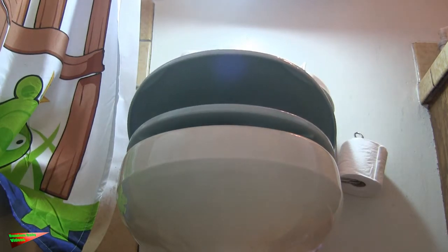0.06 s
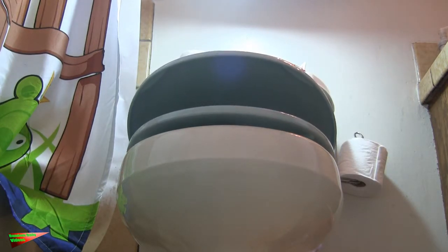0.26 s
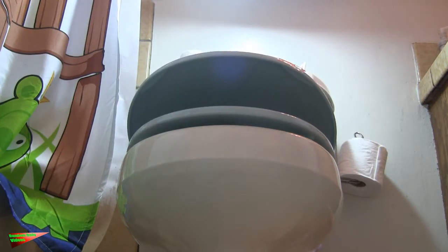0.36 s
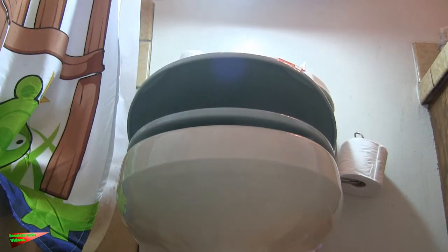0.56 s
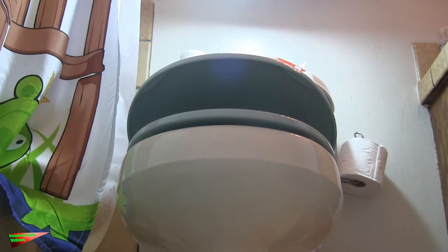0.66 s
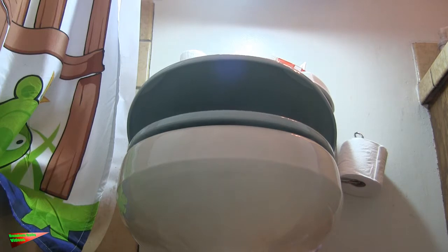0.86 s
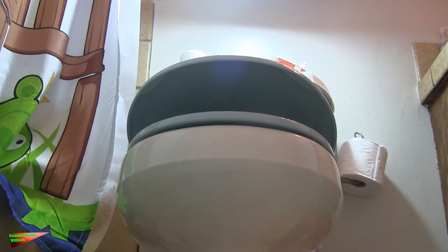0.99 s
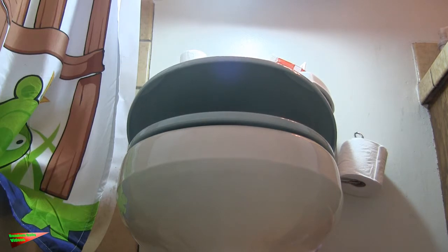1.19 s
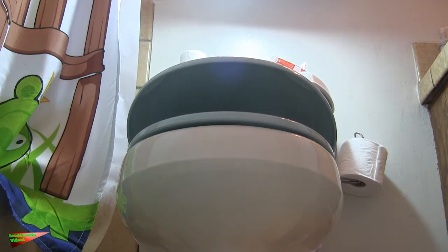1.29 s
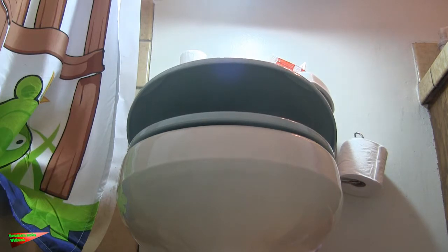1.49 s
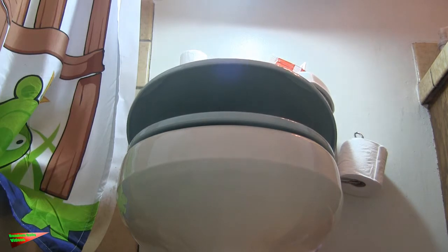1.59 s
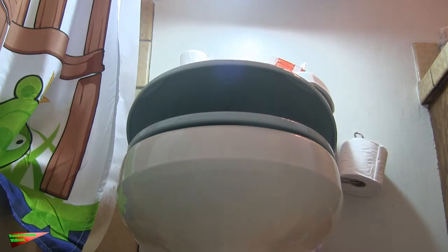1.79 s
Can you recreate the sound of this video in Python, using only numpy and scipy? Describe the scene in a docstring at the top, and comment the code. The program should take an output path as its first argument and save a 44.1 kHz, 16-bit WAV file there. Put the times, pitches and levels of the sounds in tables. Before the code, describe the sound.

A plastic toilet seat knocks against the bowl and rattles, its loose hinges clicking. After a few light taps the lid clacks with a low thud. Each hit rings briefly in a small tiled bathroom.

```python
"""A plastic toilet seat and lid are handled in a small tiled bathroom, over soft hiss and faint rubbing.
First the seat knocks against the bowl, shudders and rattles; loose hinges click and the bowl thuds.
After a few light taps the lid knocks, just before one second, with its own clicks, thud and rattle.
Faint last taps follow. The tiles give every hit a short, bright ring."""
import sys
import numpy as np
from scipy import signal
from scipy.io import wavfile

SR = 44100
rng = np.random.default_rng(int(sys.argv[2]) if len(sys.argv) > 2 else 0)


def dump_mix(stems):
    """Bounce the given channels to the path in sys.argv[1] as a 16-bit WAV at rate SR."""
    frames = np.atleast_2d(stems).T  # one column per channel
    limited = np.clip(frames, -1, 1)  # hard clip at full scale
    pcm = np.round(limited * 32767).astype(np.int16)
    wavfile.write(sys.argv[1], SR, pcm)


N = 81585
T = np.arange(N) / SR

# the bathroom's reverb: (frequency [Hz], level [dB], t60 [s], left-right likeness [0-1])
ROOM = [(100, -4, 0.49, 1), (336, -5, 0.28, 0.81), (650, 3, 0.35, 0.82), (1210, -8, 0.31, 0.87),
        (2570, -4, 0.2, 0.73), (5330, 1, 0.23, 0.8), (13000, 0, 0.16, 0.59)]


def seat():
    """The seat knocks on the bowl and bounces, with a long clatter."""
    # (time [s], level [dB], brightness [Hz])
    hits = [(.2322, -12.5, 2240), (.2352, -19, 1330), (.252, -25.5, 875), (.2785, -27.5, 860),
            (.450, -33.5, 715), (.476, -33, 434)]
    # the seat's resonances: (frequency [Hz], level [dB], t60 [s])
    modes = [(390, -9, 0.097), (476, -7, 0.044), (641, -11, .045), (739, -11, 0.039), (858, -6.5, 0.042),
             (929, -3.5, 0.059), (1035, -2.5, 0.019), (1243, 3, 0.024), (1390, -3, 0.045),
             (1535, -2, 0.032), (2130, -6.5, 0.037)]
    return struck_plastic(hits, modes, clatter_db=-4, clatter_t60=0.1768, clatter_hz=(296, 1597))


def lid():
    """The lid lands in a quick double knock and bounces once, with a tight clatter."""
    # (time [s], level [dB], brightness [Hz])
    hits = [(.9315, -18.5, 2530), (.9355, -15.5, 1860), (1.003, -31.5, 674)]
    # the lid's resonances: (frequency [Hz], level [dB], t60 [s])
    modes = [(376.6, -4.5, 0.095), (497, -7.5, 0.071), (824, -14, 0.057), (972, -6.5, 0.029),
             (1090, -1, 0.05), (1170, -1, 0.059), (1283, -0.5, 0.05), (1470, 3.5, 0.018),
             (1929, -8.5, 0.052), (2000, -13, 0.056), (2120, -14, 0.033)]
    return struck_plastic(hits, modes, clatter_db=-4, clatter_t60=0.0142, clatter_hz=(784, 1795))


def taps():
    """Plastic touches plastic lightly and rings high."""
    # (time [s], level [dB], brightness [Hz])
    hits = [(0.4441, -34.5, 1000), (.687, -56.5, 1000), (0.7522, -32.5, 8000), (.7548, -31.5, 4860),
            (1.42, -48, 990), (1.463, -59, 600), (1.84, -47.5, 1000)]
    # a tap's resonances: (frequency [Hz], level [dB], t60 [s])
    modes = [(1151, -14.5, 0.056), (1587, -1, 0.038), (1757, 1, 0.019), (2153, 0.5, 0.025),
             (2920, -2.5, 0.0086), (3640, -7, 0.091), (5550, -6, 0.018), (9200, -1, .025)]
    return struck_plastic(hits, modes, clatter_db=-7, clatter_t60=0.16, clatter_hz=(1100, 3600))


def struck_plastic(hits, modes, clatter_db, clatter_t60, clatter_hz):
    """A shell rings and its many weak modes merge into clatter; a softer contact dulls both."""
    out, shell = 0, unit_blow(ring(modes))
    for s, db, brightness_hz in hits:
        clatter = unit_blow(filtered(rng.standard_normal(N) * decay(clatter_t60), clatter_hz, "band"))
        knock = filtered(shell + from_db(clatter_db) * clatter, brightness_hz, "low")
        out += from_db(db) * delayed(unit_blow(knock), s)
    return out


def bowl_thuds():
    """Weight lands softly, waking the low modes of bowl and room near its pitch, and a short rumble."""
    # (time [s], level [dB], centre [Hz], spread to 10 dB down [octaves])
    landings = [(0.2321, -19, 167, 1.45), (0.4446, -23.5, 99.7, 1.15), (0.753, -34, 66.5, 0.56),
                (0.9317, -20.5, 81, 1.64), (1.001, -36, 142, 1.16), (1.115, -39.5, 216, 0.95),
                (1.417, -55, 140, 1.2)]
    # low resonances: (frequency [Hz], level [dB], t60 [s])
    bowl_modes = [(70.5, 2, 0.41), (89.5, -5, 0.068), (116.3, 1, 0.42), (136.1, 1, 0.33), (163, -3, 0.47),
                  (206.8, -6, 0.29), (235.8, -8.5, 0.51), (260, -3, 0.38), (405, -14, 0.23)]
    out, attack = 0, 1 - np.exp(-T / 0.0041)
    for s, db, centre, spread in landings:
        woken = [(hz, level - 10 * (np.log2(hz / centre) / spread) ** 2, t60)
                 for hz, level, t60 in bowl_modes]
        rumble = from_db(-6) * noise_band(np.sqrt(160 * centre), octaves=1.65) * decay(t60=0.45)
        out += from_db(db) * delayed((ring(woken) + rumble) * attack, s)
    return out


def seat_shudder():
    """After its knock the seat flexes freely for a moment and is stopped as it settles."""
    # bending modes: (frequency [Hz], rms level at full swing [dB])
    modes = [(140, -16.5), (207, -17.5)]
    start_s, length_s = .233, .054
    swing = np.sqrt(np.abs(np.sin(np.pi * np.minimum(T / length_s, 1))))
    flex = sum(np.sqrt(2) * from_db(db) * np.sin(2 * np.pi * hz * T) for hz, db in modes)
    return delayed(swing * flex, start_s)


def hinge_clicks():
    """Loose hinges give hard, gritty cracks, coloured by their own ringing."""
    # (time [s], level [dB], brightness [Hz])
    clicks = [(.2345, -33, 3470), (.2395, -35, 10800), (.252, -32, 4950), (.263, -36.5, 5000),
              (0.2787, -36, 5900), (0.451, -40, 3970), (0.4611, -37, 6500), (.473, -45, 3480),
              (.687, -55, 5000), (0.7526, -33.5, 9400), (0.9329, -28, 8900), (0.9433, -28.5, 14600),
              (.955, -36.5, 7000), (1.414, -52.5, 15100)]
    # hinge resonances: (frequency [Hz], width [Hz], level [dB])
    resonances = [(3540, 690, 5.5), (4920, 1200, -5.5), (8570, 580, -2), (11300, 850, -3.5)]
    out, grit_db = 0, 5
    for s, db, brightness_hz in clicks:
        grit = from_db(grit_db * flicker(600))
        burst = rng.standard_normal(N) * grit * decay(t60=0.048)
        crack = filtered(filtered(burst, 1900, "high"), brightness_hz, "low", order=1)
        ringing = sum(from_db(ring_db) * signal.lfilter(*signal.iirpeak(hz, hz / width, fs=SR), crack)
                      for hz, width, ring_db in resonances)
        out += from_db(db) * delayed(unit_blow(crack + ringing), s)
    return out


def handling_rubs():
    """Soft swells of friction noise as the seat is handled."""
    # (start [s], length [s], level [dB], centre [Hz])
    rubs = [(-.06, 0.22, -56.5, 170), (0.57, 0.18, -47.5, 170), (0.22, 0.17, -56, 3300),
            (.38, 0.11, -51, 1200), (1.55, 0.12, -68, 960), (1.78, 0.069, -53.5, 620),
            (1.77, 0.085, -56.5, 3250)]
    out = 0
    for s, length, db, hz in rubs:
        swell = np.sin(np.pi * np.clip((T - s) / length, 0, 1))
        out += from_db(db) * swell * noise_band(hz, octaves=1)
    return out


def near_field(x):
    """Direct sound a little to the right, widened by a short, bright diffuse spread; one reflection."""
    # bounce off a nearby hard surface: (delay [s], left level [dB], right level [dB])
    reflections = [(.0028, -22, -17)]
    early = sum(delayed(x, s) * from_db([[left], [right]]) for s, left, right in reflections)
    spray = filtered(rng.standard_normal(N) * decay(t60=0.018), 298, "high")
    spray += from_db(15) * filtered(spray, 2500, "high", order=1)  # treble lift
    spread = from_db(-7.5) * signal.fftconvolve(x, spray / np.sqrt(np.sum(spray ** 2)))[:N]
    return panned(x, right_db=2.5) + spread * [[1], [-1]] + early


def tile_reverb(x):
    """Dense echoes from the tiles build up quickly and die band by band."""
    predelay_s, build_s = 0.0039, 0.0018
    response, build = 0, 1 - np.exp(-np.maximum(T - predelay_s, 0) / build_s)
    for hz, share, noise in diffuse_bands():
        tail = noise * build * decay(t60=at_hz(ROOM, hz, column=2))
        response += from_db(at_hz(ROOM, hz)) * tail * np.sqrt(2 * share / np.sum(tail ** 2))
    return signal.fftconvolve(x[None], response, axes=1)[:, :N]


def room_tone():
    """Quiet hiss that flickers a little in every band; its treble rises and sinks slowly."""
    # (frequency [Hz], relative level per hertz [dB])
    spectrum = [(30, -26), (50, -12), (68, -6.5), (110, -3.5), (170, -7), (290, -8), (420, -10),
                (900, -15.5), (1500, -15), (2000, -21), (4200, -23), (7000, -26), (12000, -31.5),
                (15500, -29.5)]
    # the treble's slow contour: (time [s], level before scaling [dB])
    contour = [(0.0, -54), (0.406, -69.5), (0.514, -70), (0.736, -68), (0.916, -52), (1.602, -64),
               (1.85, -64.5)]
    times, levels = np.transpose(contour)
    treble_db = 0.34 * np.interp(T, times, levels - np.median(levels))
    out, flicker_db = 0, 1
    for hz, share, noise in diffuse_bands():
        band_db = at_hz(spectrum, hz) + flicker_db * flicker(27) + treble_db * (hz > 2000)
        out += noise * np.sqrt(share) * from_db(band_db)
    return from_db(-54) * rms_one(out)


def diffuse_bands():
    """Half-octave stereo noise, as wide as the room: (centre [Hz], share of the spectrum, noise)."""
    edges = 32 * 2 ** (np.arange(19) / 2)
    white = rng.standard_normal((2, 2, N + SR // 4))
    for k, (low, high) in enumerate(zip(edges, edges[1:])):
        hz = np.sqrt(low * high)
        mid, side = filtered(white[k % 2], [low, high], "band")[:, -N:]
        alike = at_hz(ROOM, hz, column=3)
        stereo = np.sqrt(1 + alike) * mid + np.sqrt(1 - alike) * side * [[1], [-1]]
        yield hz, (high - low) / (SR / 2), rms_one(stereo)


def ring(modes):
    """Struck modes as decaying sines of alternating sign."""
    return sum((-1) ** k * from_db(db) * decay(t60) * np.sin(2 * np.pi * hz * T)
               for k, (hz, db, t60) in enumerate(modes))


def noise_band(hz, octaves):
    """Noise around a centre, at rms 1."""
    half_width = 2 ** (octaves / 2)
    return rms_one(filtered(rng.standard_normal(N), [hz / half_width, hz * half_width], "band"))


def flicker(hz):
    """Random wavering up to a given rate, at rms 1."""
    return rms_one(filtered(rng.standard_normal(N), hz, "low"))


def decay(t60):
    """Fall by 60 dB every t60 seconds, down to a floor."""
    return from_db(-60 * np.minimum(T / t60, 4))


def filtered(x, hz, kind, order=2):
    """Butterworth filter."""
    return signal.sosfilt(signal.butter(order, hz, kind, fs=SR, output="sos"), x)


def delayed(x, s):
    """The sound, s seconds later."""
    return np.interp(T - s, T, x, left=0)


def panned(x, right_db):
    """Stereo, with the right side right_db above the left."""
    return x * from_db([[-right_db / 2], [right_db / 2]])


def at_hz(table, hz, column=1):
    """Read a table's column on a log-frequency axis."""
    table = np.array(table)
    return np.interp(np.log(hz), np.log(table[:, 0]), table[:, column])


def from_db(db):
    """Decibels to gain."""
    return 10 ** (np.asarray(db) / 20)


def rms_one(x):
    """Scale to rms 1."""
    return x / np.sqrt(np.mean(x ** 2) + 1e-20)


def unit_blow(x):
    """Scale a blow to the energy of 10 ms at rms 1."""
    return x / np.sqrt(np.sum(x ** 2) / (.01 * SR) + 1e-20)


def scene():
    """Plastic and bowl sound in the bathroom over its room tone."""
    plastic = seat() + lid() + taps() + hinge_clicks() + handling_rubs()
    low_end = filtered(bowl_thuds() + seat_shudder(), 42.4, "high")
    reverb_send = plastic + from_db(-8.5) * low_end
    return near_field(plastic) + panned(low_end, right_db=-.5) + tile_reverb(reverb_send) + room_tone()


def record(dry):
    """The microphone softens the highest treble, then a steep cut ends it."""
    soft = filtered(dry, 13750, "low")
    return signal.sosfilt(signal.ellip(10, .2, 80, 15800, fs=SR, output="sos"), soft)


dry = scene()
out = record(dry)
dump_mix(out)
```